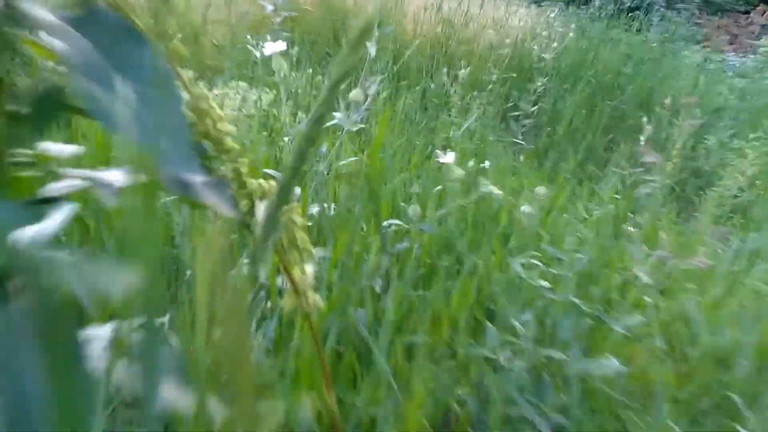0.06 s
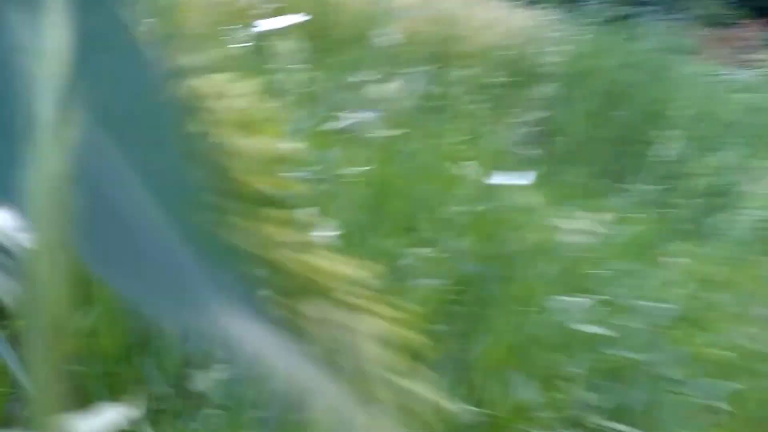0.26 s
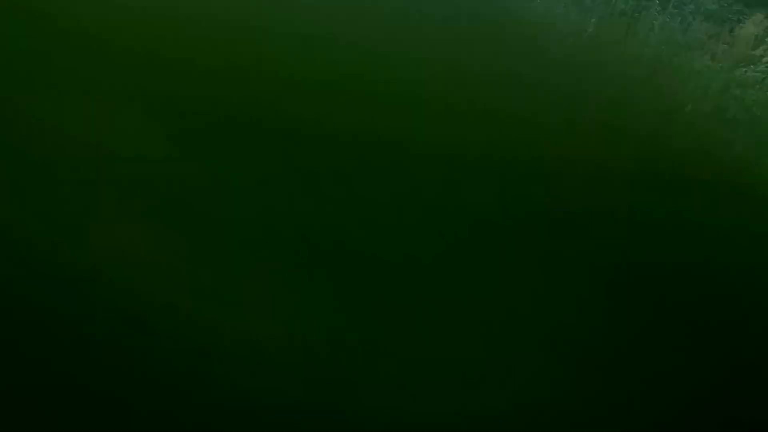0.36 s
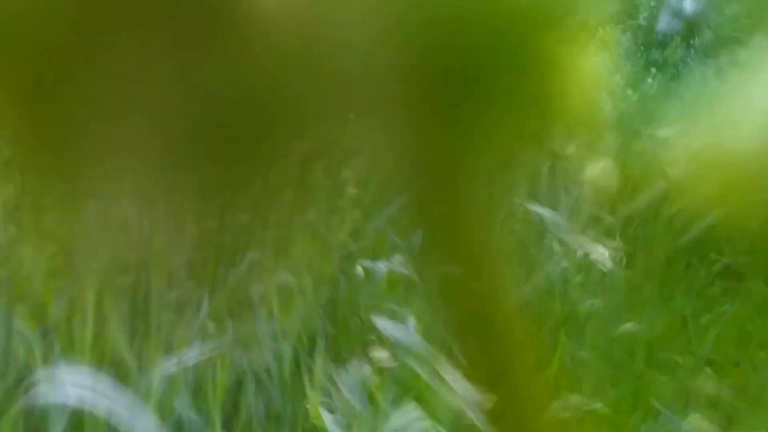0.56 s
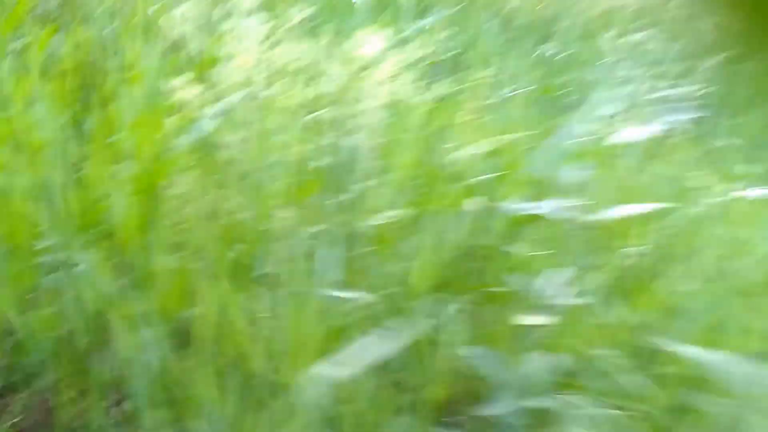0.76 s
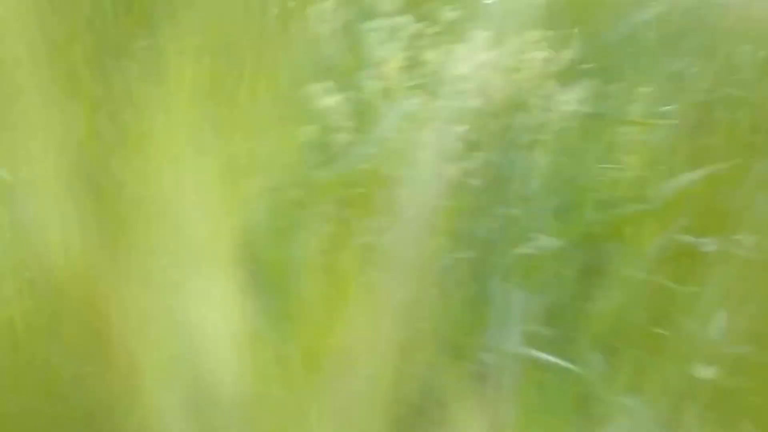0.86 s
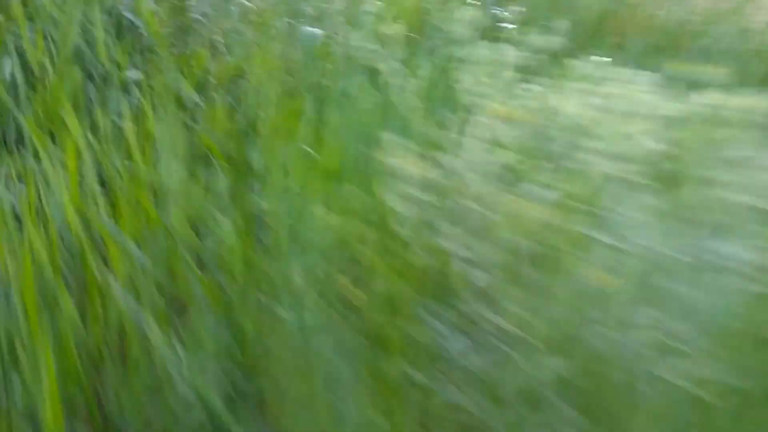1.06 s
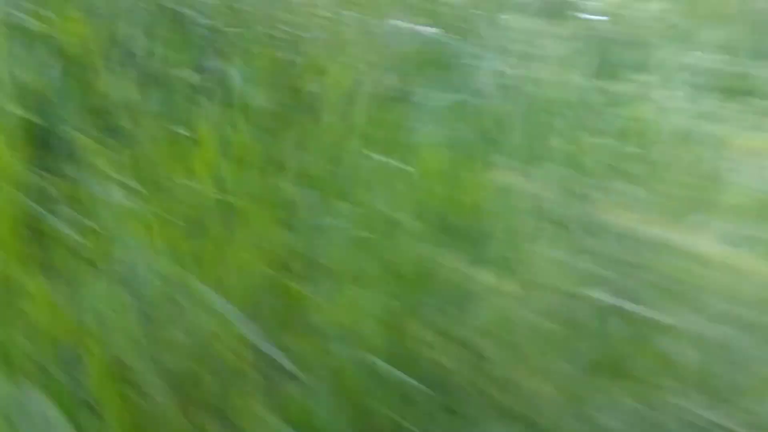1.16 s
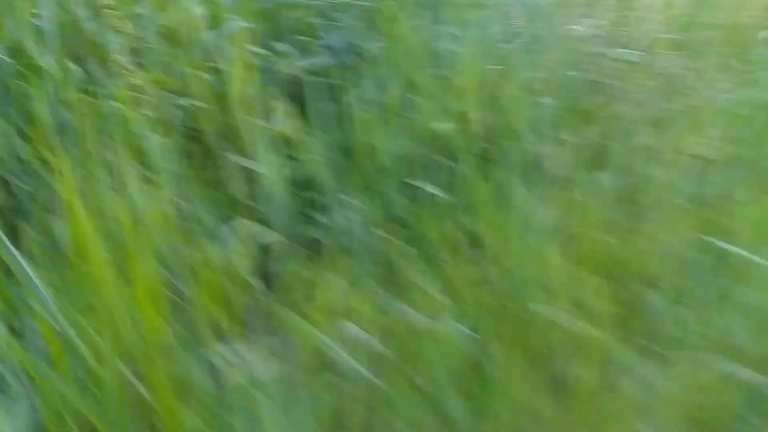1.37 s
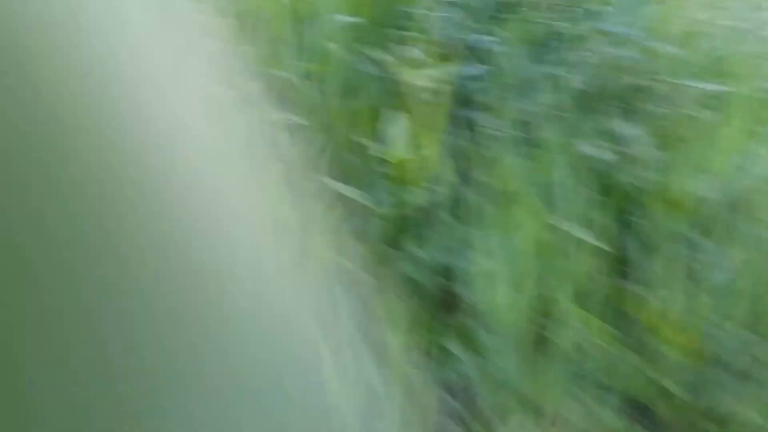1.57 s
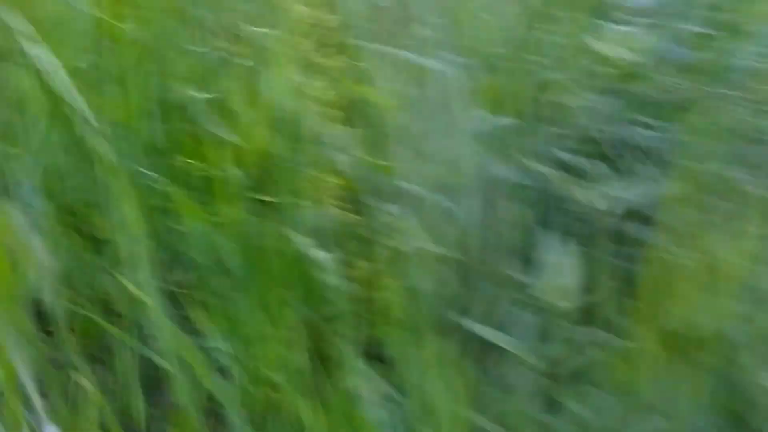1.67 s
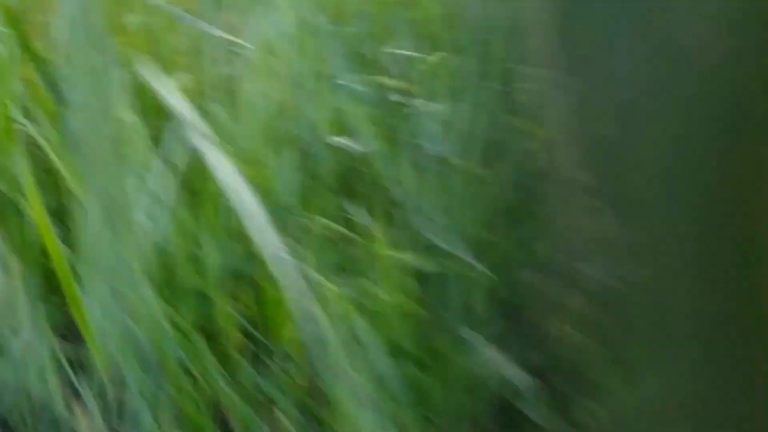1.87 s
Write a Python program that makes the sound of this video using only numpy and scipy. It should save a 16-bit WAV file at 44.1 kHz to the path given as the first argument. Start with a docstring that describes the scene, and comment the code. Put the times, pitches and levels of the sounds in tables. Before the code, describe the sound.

Grass blades rustle and swish right against a microphone moving through tall plants outdoors. A leaf scrapes and bumps loudly across the left side, then the brushing softens and stalks flick sharply, with faint low wind underneath.

```python
"""Tall grass rustles, swishes and snaps up close, over a soft rumble of moving air.
A camera is pushed low through it: blades slide past its two microphone ports, stalks flick the case,
and a broad leaf drags right over the left port with a rough, thumping scrape. Each channel hears its
own port minus the other one slightly later, so contact noise sounds wide and hollow."""
import sys
import numpy as np
from scipy import signal
from scipy.fft import rfft, irfft, next_fast_len
from scipy.io import wavfile

SR = 44100
rng = np.random.default_rng(int(sys.argv[2]) if len(sys.argv) > 2 else 0)


def pcm_store(signal):
    """Save signal as 16-bit PCM."""
    levels = np.round(np.clip(np.atleast_2d(signal), -1, 1) * 32767)
    wavfile.write(sys.argv[1], SR, levels.astype(np.int16).T)


N = 83790
TIME = np.arange(N) / SR
HIT_TIME = TIME[:SR // 20]   # the 50 ms span of one knock or snap
RING_HZ, RING_WIDTH_HZ = 4010, 570   # main resonance of the case


def from_db(db):
    """Decibels to gain."""
    return 10 ** (np.asarray(db) / 20)


def rms_one(x):
    """Scale to unit power."""
    return x / np.sqrt(np.mean(x ** 2) + 1e-20)


def peak_one(x):
    """Scale to unit height."""
    return x / (np.abs(x).max() + 1e-20)


def add(out, start_s, sound):
    """Mix a short sound in at its start time."""
    i = max(int(start_s * SR), 0)
    out[i:i + len(sound)] += sound[:N - i]


def filtered(x, kind, hz, order=2):
    """A gentle low-, high- or band-pass."""
    return signal.sosfilt(signal.butter(order, hz, kind, fs=SR, output="sos"), x)


def envelope(rows):
    """Gain along a level curve, dying quickly outside it."""
    s, db = np.transpose(rows)
    outside_s = np.maximum(s[0] - TIME, 0) + np.maximum(TIME - s[-1], 0)
    return from_db(np.interp(TIME, s, db)) * np.exp(-outside_s / 0.015)


def colour(x, points):
    """Shape x with an EQ curve, at unit power; minimum phase, so nothing rings ahead of a click."""
    hz, db = np.transpose(points)
    size = 2 * next_fast_len(N)
    bins = np.maximum(np.arange(size // 2 + 1) * SR / size, 1)
    gain = from_db(np.interp(np.log(bins), np.log(hz), db))
    low_cut = bins / np.hypot(bins, hz[0] / 2)
    cepstrum = irfft(np.log(gain * low_cut))
    cepstrum[1:size // 2] *= 2
    cepstrum[size // 2 + 1:] = 0
    response = np.exp(rfft(cepstrum))
    return rms_one(irfft(rfft(x, size) * response)[:N])


def flutter(depth_db, per_s):
    """Random wavering gain."""
    knots = rng.standard_normal(N)
    return from_db(depth_db * np.interp(TIME * per_s, np.arange(N), knots))


def grains(per_s, spread_db):
    """Random tiny clicks: many weak ones, a few strong."""
    sizes = from_db(spread_db * np.minimum(rng.exponential(1, N), 5))
    signs = rng.choice([-1, 1], N)
    return sizes * signs * (rng.random(N) < per_s / SR)


def thump(hz, rise_cycles=0.36):
    """A heavily damped swing of pressure, unit height."""
    age = HIT_TIME * hz / rise_cycles
    return peak_one(age * np.exp(-age) * np.sin(2 * np.pi * hz * HIT_TIME))


def resonance(x, hz, width_hz):
    """The part of x that rings in one mode."""
    r = np.exp(-np.pi * width_hz / SR)
    gain = (1 - r * r) / 2
    feedback = [1, -(1 + r * r) * np.cos(2 * np.pi * hz / SR), r * r]
    return signal.lfilter([gain, 0, -gain], feedback, x)


def case_smear(x):
    """The case stores sound near its main resonance and lets it go late; bass and treble pass at once."""
    # bands held around the resonance: (width [Hz])
    hold_widths = (1480, 1070, 686, 133)
    for width_hz in hold_widths:
        x = x - 2 * resonance(x, RING_HZ, width_hz)   # all-pass
    return x


def case_ring(contact, ring_db):
    """A contact plus the short ring of the case; the spot struck feeds or starves the main resonance."""
    # other modes of the case: (pitch [Hz], width [Hz], gain [dB])
    modes = [(1380, 650, 0.5), (2700, 230, 5), (5000, 300, 6.5)]
    body = contact + sum(from_db(db) * resonance(contact, hz, width) for hz, width, db in modes)
    return case_smear(body + (from_db(ring_db) - 1) * resonance(body, RING_HZ, RING_WIDTH_HZ))


def crossed(port, delay_ms):
    """A port's signal as the opposite channel has it: later and inverted."""
    bins = np.arange(N + 1) * SR / (2 * N)
    delay = np.exp(-2j * np.pi * bins * delay_ms / 1000)
    return -from_db(0.03) * irfft(rfft(port, 2 * N) * delay)[:N]


def noise_bed():
    """A faint, steady bed of low noise and hiss, separate in each channel."""
    # tone of the bed: (frequency [Hz], relative level [dB])
    tone = [(50, -12), (300, -4.5), (1000, -21), (3000, -40), (16000, -16.5)]
    return from_db(-55) * np.array([colour(noise, tone) for noise in rng.standard_normal((2, N))])


def wind():
    """Air moving past the ports: a lumpy low rumble, opposite in polarity in the two channels."""
    # swells of air: (time [s], level [dB])
    gusts = [(0, -70), (0.06, -49), (0.125, -29), (0.16, -48), (0.26, -51.5), (0.32, -46.5), (0.6, -42),
             (0.69, -54.5), (0.8, -59), (0.91, -48), (0.98, -47), (1.055, -41.5), (1.13, -47.5),
             (1.22, -37.5), (1.29, -41), (1.345, -61), (1.39, -47), (1.44, -56), (1.48, -55), (1.75, -49),
             (1.86, -47.5)]
    # tone of the rumble: (frequency [Hz], relative level [dB])
    tone = [(25, -43), (60, -3), (120, 3), (200, -3.5), (320, -14), (700, -65), (2000, -52)]
    turbulence = rng.standard_normal(N) * flutter(depth_db=4, per_s=45)
    air = envelope(gusts) * colour(turbulence, tone)
    return np.array([-from_db(-0.5) * air, from_db(4.13) * air])


def patter():
    """Passing blades land on the camera body in sparse, dull taps."""
    # weight of the tapping: (time [s], level [dB])
    levels = [(0.03, -49.5), (0.12, -46.5), (0.2, -54), (0.9, -58), (1.03, -47), (1.16, -68), (1.37, -53),
              (1.4, -43.5), (1.44, -76), (1.65, -46.5), (1.85, -62.5)]
    taps = grains(per_s=160, spread_db=3) + 1e-18
    return envelope(levels) * rms_one(filtered(taps, "band", hz=(284, 860)))


def rustle():
    """Blades slide along the case with a fine crackle."""
    # surges of grass on the case: (time [s], level [dB])
    levels = [(0.015, -53.5), (0.028, -46.5), (0.1, -41.5), (0.145, -58.5), (0.23, -57.5), (0.27, -69),
              (0.35, -44.5), (0.45, -43.5), (0.555, -31), (0.6, -38.5), (0.64, -46), (0.77, -55.5),
              (0.885, -44.5), (0.925, -50), (1.0, -51), (1.04, -53.5), (1.19, -56), (1.25, -64.5),
              (1.405, -56), (1.425, -68), (1.458, -60), (1.474, -43.5), (1.51, -49), (1.55, -51),
              (1.61, -48), (1.64, -36.5), (1.67, -53), (1.75, -47), (1.78, -59), (1.85, -50), (1.895, -50)]
    # tone of the crackle: (frequency [Hz], relative level [dB])
    tone = [(150, 0), (350, 1.5), (700, -3), (1600, 1), (2800, 0.5), (4100, 1), (6000, -5), (8500, -13),
            (13500, -7.5), (16000, -23)]
    slips = grains(per_s=9000, spread_db=3) * flutter(depth_db=4.5, per_s=130)
    return from_db(2.5) * envelope(levels) * colour(case_smear(slips), tone)


def swish():
    """Blade tips brush the right port with a bright hiss."""
    # two passes of the tips, each a curve of (time [s], level [dB])
    passes = [
        [(0.02, -77), (0.09, -30.5), (0.095, -34.5), (0.15, -61)],
        [(0.64, -45), (0.76, -50), (0.85, -47.5), (0.965, -51), (1.075, -48), (1.145, -36.5), (1.205, -35.5),
         (1.245, -48.5), (1.375, -53), (1.405, -50), (1.42, -59)],
    ]
    # tone of the hiss: (frequency [Hz], relative level [dB])
    tone = [(400, -10), (1500, -12.5), (3000, -3.5), (5000, -10.5), (6300, 4), (9000, -1), (13000, -4.5),
            (16000, -12)]
    slips = grains(per_s=4200, spread_db=1) * flutter(depth_db=1.5, per_s=130)
    return from_db(-4) * sum(envelope(rows) for rows in passes) * colour(slips, tone)


def leaf_drag():
    """A leaf sticks and slips on the left port, pumping the air inside into a dark scrape."""
    # a long and a short drag, each a curve of (time [s], level [dB])
    passes = [
        [(0.36, -55), (0.388, -43), (0.396, -29), (0.435, -29), (0.466, -20.5), (0.48, -30.5), (0.495, -30.5),
         (0.51, -26.5), (0.555, -17.5), (0.578, -37.5), (0.62, -39.5), (0.66, -53.5)],
        [(1.56, -70), (1.57, -40.5), (1.585, -36.5), (1.6, -63)],
    ]
    # tone of the scrape: (frequency [Hz], relative level [dB])
    tone = [(55, -25), (110, -6.5), (175, 1), (400, -6), (1100, -15.5), (2000, -21), (4000, -29),
            (8000, -45), (15000, -49)]
    slips = grains(per_s=2200, spread_db=3) * flutter(depth_db=4.5, per_s=150)
    return from_db(8.5) * sum(envelope(rows) for rows in passes) * colour(slips, tone)


def leaf_bumps(crunch_db=-10.5, crunch_decay_s=0.0031):
    """Leaves and stems knock on the port, each a soft thump with a short dry crunch."""
    # knocks on the port: (time [s], level [dB], pitch [Hz])
    knocks = [(0.124, -26, 150), (.394, -16, 710), (0.4145, -3.5, 170), (.443, -13, 716), (0.458, -4, 185),
              (.466, -2, 830), (0.504, -6.5, 200), (.518, -11, 950), (0.534, -9, 330), (0.55, -12, 715),
              (0.5635, -13, 510), (.779, -38.5, 870), (1.055, -29.5, 186), (1.087, -29.5, 585),
              (1.1128, -30, 780), (1.224, -26, 120), (1.275, -23.5, 114), (1.378, -28.5, 537),
              (1.584, -19, 750), (1.745, -31, 680)]
    out = np.zeros(N)
    for start_s, db, hz in knocks:
        grit = rng.standard_normal(len(HIT_TIME)) * np.exp(-HIT_TIME / crunch_decay_s)
        crunch = peak_one(filtered(grit, "band", (hz, 3 * hz)))
        add(out, start_s, from_db(db) * (thump(hz) + from_db(crunch_db) * crunch))
    return out


def stalk_snaps():
    """Stalks flick the case: a sharp tick, a gritty knock at the stalk's pitch, a ring, a faint thud."""
    # stalk hits: (time [s], level [dB], pitch [Hz], grit decay [ms], relative tick level [dB],
    # main resonance boost [dB])
    hits = [(.022, -33, 5000, 0.67, 0, 5), (0.109, -22, 6500, 1.1, -5, 0),
            (.162, -19, 4630, 3.4, -16, -2.5), (0.206, -35, 1600, 6, 7, -10),
            (0.2369, -12, 4370, 0.88, -7, 8.5), (0.2755, -30, 1064, 1.8, -20, -14),
            (0.2995, -15, 2070, 1.5, -0.5, -20), (0.3885, -28, 4840, 5.1, 6.5, 13),
            (0.5486, -9.5, 1880, 10, -5, 10), (0.593, -20.5, 4170, 6.8, -18, 27),
            (0.6174, -9, 2740, 2.3, -12, 1.5), (0.6712, -21.5, 2900, 2.5, -6, -3),
            (0.894, -27.5, 2720, 3.3, -3, 11), (1.309, -28, 4660, 3, 1.5, 14),
            (1.368, -34, 6000, 0.71, 7, -3), (1.387, -31, 6500, 1.1, 2, -6),
            (1.3943, -19.5, 7170, 3, -0.5, -3), (1.4624, -4.5, 2870, 1.7, -41, 0.5),
            (1.583, -15.5, 1920, 2.8, -8, -1), (1.6087, -4.5, 2320, 0.8, -2.5, -25),
            (1.7145, -10, 3060, 0.45, -11.5, 0), (1.7465, -28, 2660, 11, -4, -10),
            (1.7946, -30.5, 2980, 2.8, 2.5, -7), (1.8241, -29, 3350, 2.1, 3.5, -12)]
    out = np.zeros(N)
    ms = 1000 * HIT_TIME
    thud = from_db(-26) * thump(hz=160)
    for start_s, db, hz, decay_ms, tick_db, ring_db in hits:
        grit, crack = rng.standard_normal((2, len(ms)))
        contact = signal.unit_impulse(len(ms)) + 0.13 * grit * np.exp(-ms / decay_ms)
        knock = filtered(contact, "band", (hz / 1.68, hz * 1.767))
        ringing_knock = peak_one(case_ring(knock, ring_db))
        tick = peak_one(filtered(crack * np.exp(-ms / (0.27 * decay_ms)), "high", hz=5900))
        add(out, start_s, from_db(db) * (ringing_knock + from_db(tick_db) * tick + thud))
    return out


def scene():
    """Most contacts hit the left port; the right gets swish and thin rustle, which cross over dulled."""
    left = rustle() + leaf_drag() + patter() + leaf_bumps() + stalk_snaps()
    right = swish() + from_db(-4.5) * filtered(rustle(), "high", hz=5450)
    dulled_right = filtered(right, "low", hz=5500, order=1)
    grass = np.array([left + crossed(dulled_right, delay_ms=0.393),
                      right + crossed(left, delay_ms=0.396)])
    return grass + noise_bed() + wind()


def record(dry, ceiling=0.9, cutoff_hz=16000):
    """A soft clip rounds the highest peaks, then a steep low-pass cuts the very top."""
    rounded = dry / (1 + (dry / ceiling) ** 6) ** (1 / 6)
    return signal.sosfilt(signal.ellip(10, .2, 80, cutoff_hz, fs=SR, output="sos"), rounded)


dry = scene()
out = record(dry)
pcm_store(out)
```